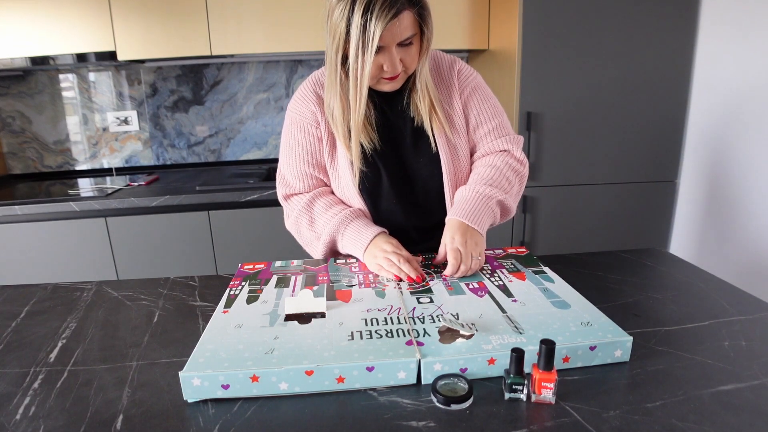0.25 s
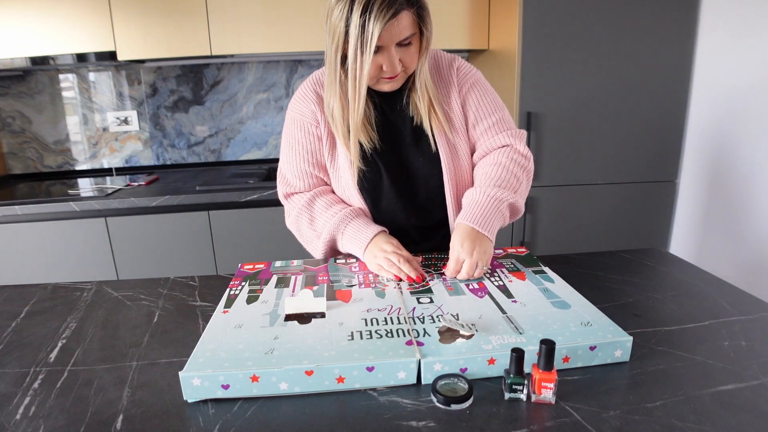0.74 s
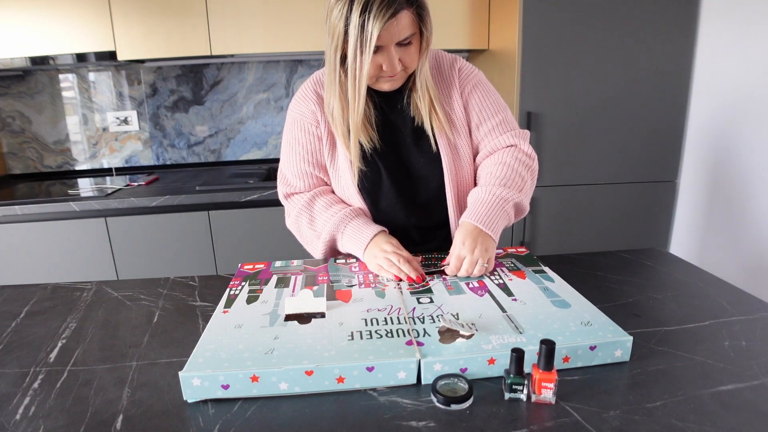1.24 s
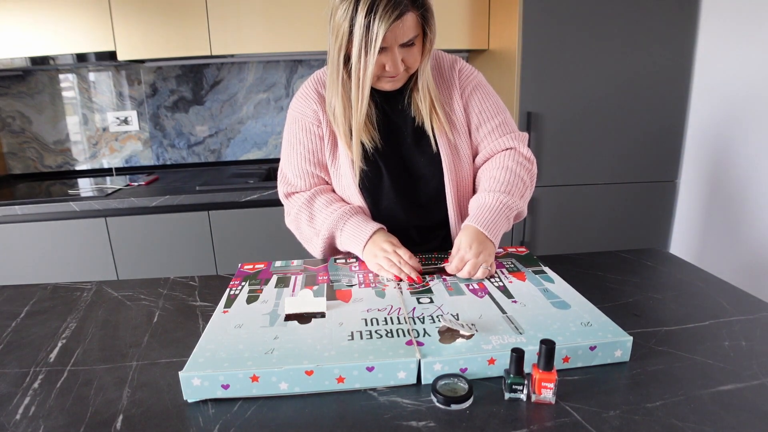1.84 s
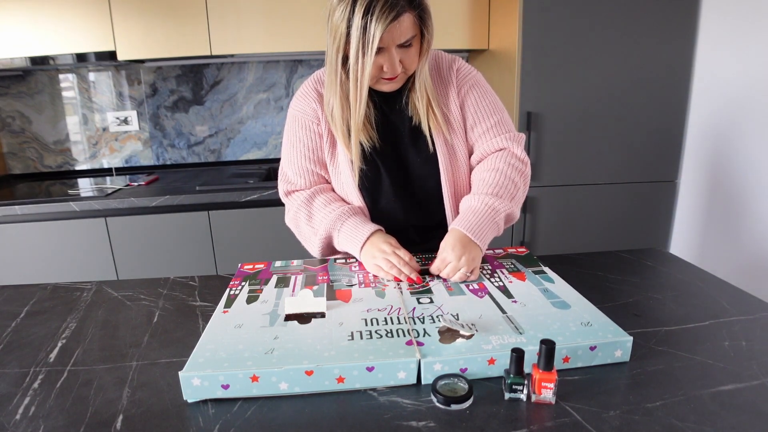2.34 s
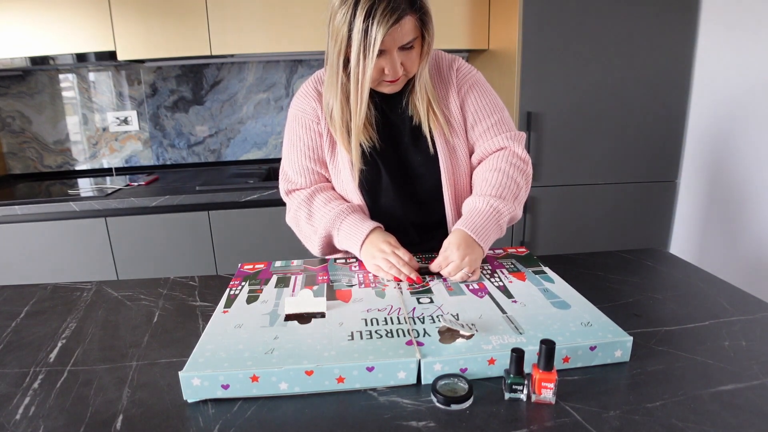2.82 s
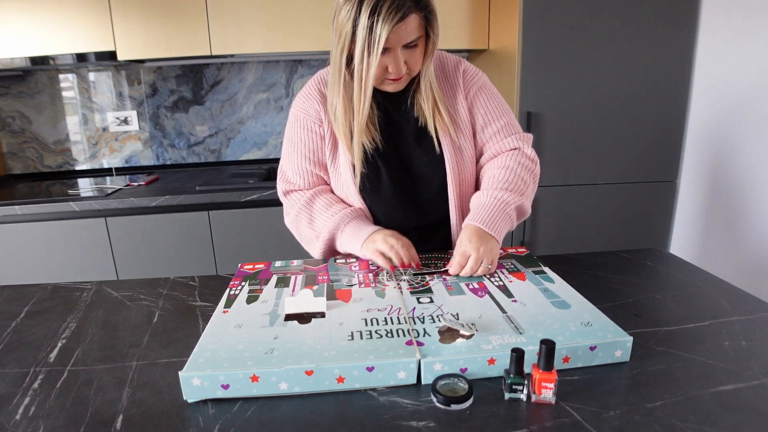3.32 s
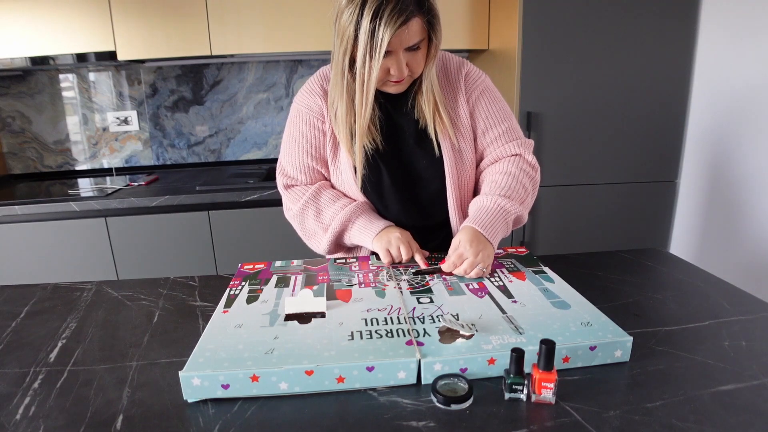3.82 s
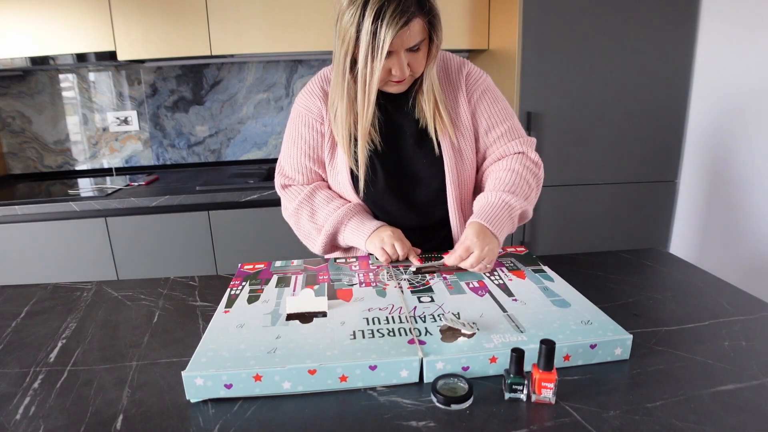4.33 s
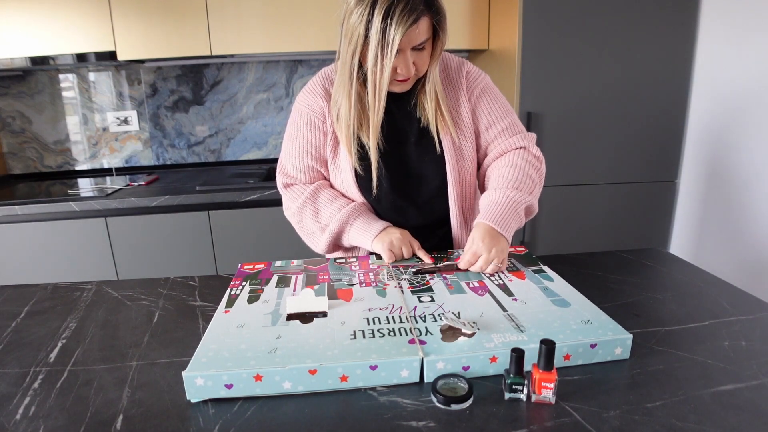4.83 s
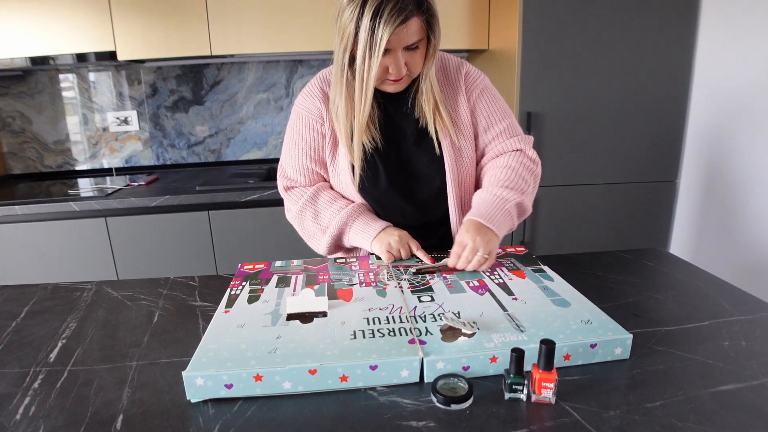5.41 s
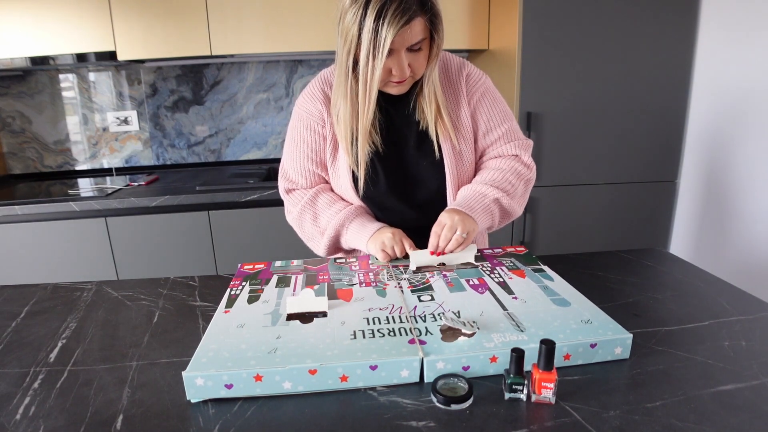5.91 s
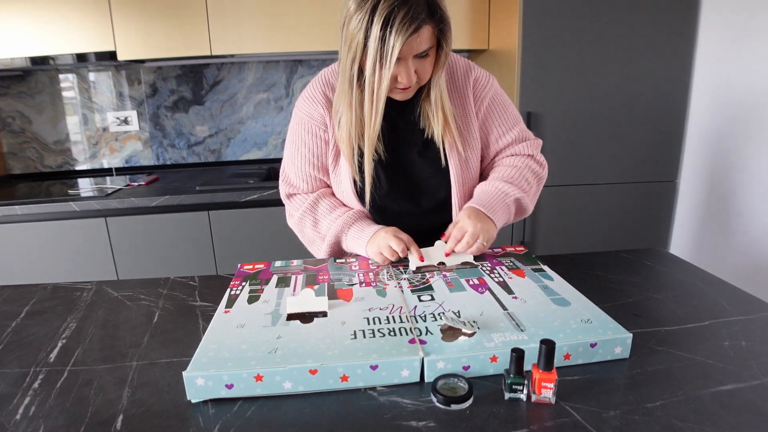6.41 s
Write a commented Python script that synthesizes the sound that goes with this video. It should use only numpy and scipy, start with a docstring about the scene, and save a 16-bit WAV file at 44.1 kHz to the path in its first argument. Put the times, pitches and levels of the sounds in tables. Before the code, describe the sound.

Fingers pry at a perforated flap in a thin, flat hollow cardboard box. A crisp snap comes first, then a loud tight cluster of tearing cracks with hollow thuds, and another single snap. After that come quieter ticks and soft papery rustling, growing busier and crisper towards the end. Close-to-medium stereo microphone in a hard-walled kitchen, short bright reverberation, faint steady hush.

```python
"""Perforations in a card lid tear: fingers pry at a flap in the thin lid of a flat hollow box, in a bare
kitchen. Each snap is a short ragged noise burst that excites resonances of box, lid, flap, torn edge and
fibres. Thumps under the stronger snaps and booms excite the low modes of the box; the rustle of rubbing is a
dense train of random slips, with crackles, and the same noise also carries a lingering wash after snaps. Hard
walls add early echoes and a diffuse tail that decays band by band, over a faint steady hush."""
import sys
import numpy as np
from scipy import signal
from scipy.fft import rfft, irfft, next_fast_len
from scipy.io import wavfile

SR = 44100
rng = np.random.default_rng(int(sys.argv[2]) if len(sys.argv) > 2 else 0)


def put_to_file(sound):
    """Save the sound as 16-bit audio at rate SR, in the file named by the first command-line argument."""
    columns = np.atleast_2d(sound).T  # one column per channel
    safe = np.clip(columns, -1, 1)
    whole_steps = np.round(safe * 32767)
    wavfile.write(sys.argv[1], SR, whole_steps.astype(np.int16))


N = 293474  # samples

# Resonances of the hollow box, its lid and the flap, broad because card is lossy:
# (frequency [Hz], width at about -6 dB [Hz], relative level [dB])
BOX_MODES = [(247.6, 113, -7), (288, 67, -7.5), (336, 48, -4), (409, 95, -8.5), (484, 47, 0),
             (551, 120, -5)]
LID_MODES = [(717, 240, 2), (871, 94, -6.5), (1099, 410, -3.5)]
FLAP_MODES = [(1185, 750, 0), (1750, 690, 0), (2214, 660, 0.016)]


def snaps():
    """Impulsive excitation: each tear drives six resonant parts, in proportions set by its colour and pitch."""
    # Perforations letting go: (time [s], drive level [dB], lid body [dB re drive], edge rasp [dB re drive],
    # fibre tick [dB re drive], low, middle and high tab ring [Hz], ring strength [dB], length [ms])
    snap_events = [(0.0271, -19.5, -16.5, -21.5, -22, 2140, 2510, 6660, 6.8, 2.15),
                   (0.1078, -27.5, -15, -8, -13, 1440, 3300, 5970, 7.8, 1.3),
                   (0.167, -20, -4.5, -15, -17, 1550, 3220, 5400, 8.9, 2.1),
                   (0.1778, -5.5, -11, -18.5, -22, 694, 3300, 5500, 5.7, 1.9),
                   (0.2019, -29, -3.5, -8, -11, 780, 4000, 5200, 14, 1.8),
                   (0.612, -25, -23, -29, -34, 861, 2600, 5000, 5.7, 1.2),
                   (0.6584, -39.5, -10, -19, -22, 789, 2610, 5080, 7, 2),
                   (0.6926, -40.5, 0, -13, -18, 1930, 3020, 6250, 13, 1.2),
                   (0.7037, -6.5, -15, -13, -18.5, 2130, 3360, 5800, 5.5, 1.57),
                   (0.7076, -2, -25, -36, -35, 1930, 2650, 5850, 2.5, 2.1),
                   (0.7497, -7.5, -11.5, -19.5, -20, 1340, 2670, 5530, 7, 2.3),
                   (0.7536, -11.5, -7, -20, -29, 875, 2640, 4880, 9.5, 1.5),
                   (0.7784, -15.5, -4, -9.5, -18, 850, 3060, 6080, 6.7, 1.65),
                   (0.7866, -5.5, -13, -32, -38, 820, 2670, 5910, 4.5, 2),
                   (0.8255, -19.5, -4.5, -24, -26, 856, 2410, 5600, 5.5, 2.2),
                   (0.8614, -18, -8.5, -13, -12, 776, 4500, 7840, 8.6, 1.5),
                   (0.8704, -6.5, -8, -20.5, -20, 850, 2800, 8000, 5.5, 1.46),
                   (0.9038, -13.5, -1.5, -12, -11, 700, 3440, 6080, 3.2, 1.7),
                   (0.9184, -13, -12.5, -13.5, -15, 1220, 3100, 5100, 7.2, 2.2),
                   (0.9406, -20.5, -13, -33, -27, 1380, 2460, 6370, 13, 1.8),
                   (0.9544, -23.5, -6, -12, -17, 724, 2470, 6000, 9.1, 2),
                   (1.056, -26, -17, -19, -30, 740, 2560, 5940, 11, 1.8),
                   (1.0714, -32.5, -10, -9, -8, 680, 2490, 5580, 6, 1.8),
                   (1.1021, -19, -16.5, -12.5, -15.5, 861, 2640, 7430, 5.2, 2.1),
                   (1.3061, -36, -19, -15, -13, 2240, 3480, 8130, 7.5, 2),
                   (1.4524, -36, -17, -15, -20, 1800, 2600, 6100, 7, 2.2),
                   (1.4711, -4, -15.5, -15.5, -17.5, 840, 2570, 5500, 5.3, 1.64),
                   (1.8217, -46, -20, -18, -30, 1900, 2440, 6360, 10, 2.4),
                   (2.01, -35, -18.5, -18, -38, 2480, 2630, 6180, 7.5, 1.8),
                   (2.0856, -26, -29.5, -25, -22, 1960, 3040, 6580, 5.2, 2),
                   (2.1793, -36, -13, -17, -26, 2200, 2830, 4900, 7.8, 1.8),
                   (2.2787, -31.5, -31, -21.5, -27, 1870, 3840, 5000, 4.6, 2.6),
                   (2.3505, -26.5, -12.5, -18.5, -31, 1080, 3220, 5200, 8.1, 2.15),
                   (2.3853, -13, -27.5, -28, -37, 1180, 2580, 5360, 6.2, 2.2),
                   (2.471, -38, -8, -16, -24, 2090, 3580, 5990, 8.4, 1.8),
                   (2.5089, -27, -37, -18, -25, 1690, 4060, 7130, 5.8, 1.2),
                   (2.5154, -32, -20, -26, -30, 2100, 3920, 4900, 9.9, 1.8),
                   (2.5278, -34, -34, -15, -31, 1590, 3590, 7270, 8.2, 1.8),
                   (2.5373, -33.5, -24, -25, -34, 2100, 4300, 4990, 8.3, 1.8),
                   (2.6532, -18.5, -21.5, -18.5, -24, 1860, 2860, 6900, 9.6, 2.3),
                   (2.6689, -21, -12.5, -16, -14.5, 2140, 3670, 7070, 11.5, 1.54),
                   (2.686, -20.5, -19, -17, -19, 1700, 2850, 7100, 5, 2.1),
                   (2.7084, -25.5, -19, -31, -25, 1800, 2430, 6700, 8.1, 2),
                   (2.7824, -39, -20, -20, -29, 1810, 3060, 7500, 7.8, 1.8),
                   (2.8011, -39, -24, -22, -27, 1720, 3270, 6780, 6.3, 2),
                   (2.8647, -41.5, -8.5, -30, -32, 1770, 2750, 6740, 6.4, 1.5),
                   (2.8838, -29.5, -27, -25, -31, 1190, 2650, 6600, 5.2, 2.1),
                   (2.9578, -10, -30.5, -35, -48, 1140, 3740, 5400, 8.9, 1.4),
                   (3.0145, -23.5, -27, -29, -36, 1950, 2500, 5030, 4.3, 2.1),
                   (3.0572, -24, -14.5, -39, -42, 940, 2720, 5040, 8.2, 1.9),
                   (3.1063, -36, -16, -26, -23, 1130, 3420, 7080, 10, 1.8),
                   (3.1402, -39, -21, -10, -26, 1770, 3970, 7280, 6.2, 2.3),
                   (3.1642, -39, -1.5, -21, -26, 1190, 2770, 6040, 10.4, 2.4),
                   (3.3513, -36, -19, -20, -22, 2170, 3400, 7520, 8.6, 2.1),
                   (3.381, -60, 8, 5, 1, 1890, 3070, 5760, 8.6, 2),
                   (3.4105, -30, -15, -12, -22, 800, 3420, 5770, 6.2, 2),
                   (3.5233, -38, -6, -31, -14, 2080, 3200, 6160, 12.7, 1.7),
                   (3.6094, -36, -9, -16, -23, 2090, 4660, 7670, 8.2, 2.2),
                   (3.6823, -33.5, -22, -26, -40, 2040, 3380, 6270, 9.4, 2),
                   (3.857, -40.5, -20, -19, -22, 2120, 2850, 6370, 6.4, 2.3),
                   (3.904, -33, -9.5, -8, -23, 1070, 2670, 5430, 6.3, 1.5),
                   (4.1834, -46, -33, -15.5, -40, 802, 3470, 5670, 7, 1.8),
                   (4.2026, -36, -43, -13, -26, 2220, 3170, 5190, 5.6, 2.8),
                   (4.2506, -26, -22, -17, -25, 2030, 2620, 7300, 7, 2.5),
                   (4.2582, -23, -16, -10, -23, 760, 2780, 7150, 11.8, 2),
                   (4.2771, -27, -17, -13, -17, 694, 2720, 7070, 6, 2.3),
                   (4.3007, -24.5, -17, -7, -12, 2200, 4750, 7700, 8.2, 1.9),
                   (4.4284, -43, -18, -19, -24, 1060, 3000, 7570, 8, 1.5),
                   (4.4367, -33, -11, -29, -28, 1180, 2470, 5480, 11, 1.43),
                   (4.7477, -41, -37, -13, -34, 2230, 4000, 5060, 11, 2.6),
                   (4.8772, -34, -34, -18, -23, 1750, 2960, 6200, 9.7, 2.7),
                   (4.9897, -28, -15.5, -10.5, -13.5, 1290, 3700, 6100, 5.3, 2.3),
                   (5.0178, -32.5, -21, -10, -18, 2100, 3050, 6700, 7.3, 1.7),
                   (5.1211, -29.5, -37, -8.5, -19, 2300, 3980, 6500, 6.5, 2),
                   (5.1639, -30, -45, -14, -20, 2270, 3850, 8310, 6.4, 2.5),
                   (5.2016, -36.5, -30, -7, -16, 2070, 3840, 5350, 4.5, 1.3),
                   (5.2123, -37.5, -36, -7, -13, 2160, 2610, 6510, 5.8, 1.6),
                   (5.232, -41, -28, -4.5, -13, 1850, 3720, 6380, 7, 2),
                   (5.2887, -30.5, -37, -21, -56, 1800, 2980, 5740, 10.2, 1.9),
                   (5.3205, -32, -32, -21, -26, 1970, 2940, 5940, 8.6, 1.6),
                   (5.3472, -44, -32, -10, -28, 1920, 3260, 4900, 7, 1.8),
                   (5.3722, -31, -42, -22, -41, 1770, 3290, 6350, 11, 1.9),
                   (5.4103, -31, -41, -23, -34, 1860, 2980, 4930, 10, 1.9),
                   (5.4446, -29, -44, -22, -33, 2050, 2890, 4980, 9.3, 2.8),
                   (5.4736, -29.5, -24, -17, -21, 2160, 3220, 6550, 8.3, 2),
                   (5.5147, -34.5, -50, -15, -20, 1800, 3640, 5600, 9.9, 1.8),
                   (5.5837, -35, -39, -15, -24, 2260, 3590, 6340, 7, 1.6),
                   (5.5983, -36, -35, -12, -23, 2170, 3110, 5150, 9.3, 3.6),
                   (5.6153, -30, -16.5, -11, -19, 700, 3370, 5660, 7.3, 2.2),
                   (5.6889, -41, -33, -17, -27, 732, 3270, 5920, 9.1, 2),
                   (5.7693, -43, -23, -6, -8, 2120, 2790, 5800, 9.1, 0.61),
                   (5.7804, -50, -29, 2, -6, 2030, 3240, 5600, 20, 1.5),
                   (5.8135, -29, -49, -27, -38, 2230, 3140, 5810, 11, 1.5),
                   (5.825, -30, -41, -31, -38, 1700, 3440, 5770, 7, 1.8),
                   (5.8484, -49, -23, -3, -7, 2230, 3330, 6410, 6, 1.3),
                   (5.8681, -39.5, -26, 3, -4, 1500, 3580, 5500, 10, 1.4),
                   (5.9034, -36, -29, -9, -9, 2000, 2620, 5250, 4, 2.6),
                   (5.9218, -29, -32, -8, -13, 2150, 3420, 5400, 9.4, 1.9),
                   (5.9264, -21.5, -22, -16.5, -23, 2230, 3150, 5300, 9.4, 1.6),
                   (6.025, -39, -13, -15, -11, 1540, 2980, 5260, 7, 2.6),
                   (6.143, -35, -21, -2.5, -12, 1740, 4790, 5130, 8.3, 1.6),
                   (6.1498, -33, -20, -21, -25, 2230, 4820, 4940, 5.6, 1.6),
                   (6.1585, -21, -27, -12.5, -17.5, 2350, 2360, 5200, 6.9, 1.8),
                   (6.2243, -36.5, -18, -4, -9, 2300, 4340, 5250, 5, 2.2),
                   (6.242, -35.5, -10.5, -18, -10, 1430, 3010, 5240, 11, 1.6),
                   (6.253, -38.5, -14, 6.5, 1, 2270, 4130, 6900, 7.5, 1.8),
                   (6.265, -35.5, -11, 0, -5, 1640, 4020, 6660, 10, 2.3),
                   (6.2922, -16, -13, -10.5, -14.5, 2270, 2340, 5880, 5.2, 2.43),
                   (6.3202, -31.5, -28, -1, -18, 1130, 2360, 6850, 7, 2.7),
                   (6.4214, -33, -17, -16, -18, 2250, 2400, 5570, 6.3, 1.5),
                   (6.4806, -35, -19, -22, -31, 1490, 3590, 6150, 11, 1.7),
                   (6.4915, -29.5, -14.5, -17.5, -35, 872, 3690, 5590, 10.5, 1.3)]
    # Drive of box, lid, flap, crack, edge, fibres: (level [dB re drive], share of body [dB/dB],
    # share of rasp [dB/dB], share of tick [dB/dB], slope with ring pitch above 2 kHz [dB/octave])
    part_drive = [(-15.5, 0.78, -0.24, 0.25, 1), (1.5, 1.0, -0.021, 0.033, -3),
                  (-9.5, 0.31, -0.18, 0.044, -1), (-5.5, -0.086, 0.52, 0.0052, -1),
                  (-3.5, 0.0087, 0.92, 0.017, 1.5), (-4, -0.14, 0.083, 1.05, 0)]
    # Ring strength of the middle ring, the high ring and its overtone: (level [dB re low ring])
    ring_steps = [0.33, -2, -3.5]
    # Resonances of crack, torn edge and fibres: (frequency [Hz], width at about -6 dB [Hz], relative level [dB])
    crack_modes = [(2580, 860, 3.3), (3440, 1960, 2.5), (4460, 1790, -4.5)]
    edge_modes = [(5350, 2300, 0.17), (6400, 6200, -1.6), (7940, 3700, -0.27)]
    fibre_modes = [(9340, 3100, 8), (11140, 5400, 2), (14900, 2600, -2)]
    overtone_ratio = 1.73

    rows = np.array(snap_events)
    base_db, *shares = np.transpose(part_drive)
    ragged = rng.standard_normal((len(rows), 512))
    drive = np.zeros((6, N + 512))
    for row, noise in zip(rows, ragged):
        s, level_db, body_db, rasp_db, tick_db, low_hz, mid_hz, high_hz, ring_db, length_ms = row
        overtone_hz = min(overtone_ratio * high_hz, 15000)
        rings = [(low_hz, ring_db),
                 (mid_hz, ring_db + ring_steps[0]),
                 (high_hz, ring_db + ring_steps[1]),
                 (overtone_hz, ring_db + ring_steps[2])]
        burst = tear(noise, length_ms, rings)
        pitch_octaves = np.log2(np.sqrt(low_hz * mid_hz) / 2000)
        colour = [body_db, rasp_db, tick_db, pitch_octaves]
        gains = from_db(level_db + base_db + np.dot(colour, shares))
        start = max(round(s * SR) - 20, 0)
        drive[:, start:start + 512] += gains[:, None] * burst
    parts = [BOX_MODES, LID_MODES, FLAP_MODES, crack_modes, edge_modes, fibre_modes]
    return sum(resonate(force[:N], modes) for force, modes in zip(drive, parts))


def tear(noise, length_ms, rings, evenness=0.7):
    """Fracture noise: a ragged burst, nearly even in spectrum; any rings given boost it at the tab's modes."""
    ring_q = 9
    peak_s = np.clip(length_ms, .3, 6) / 2000  # the envelope peaks at half the length
    rise = np.arange(len(noise)) / SR / peak_s
    shape = rise * np.exp(1 - rise)
    burst = noise * shape
    for _ in range(3):  # flatten the spectrum, then restore some of the envelope
        spectrum = rfft(burst)
        flattened = irfft(spectrum / (np.abs(spectrum) + 1e-9) ** evenness, len(noise))
        burst = flattened * shape ** 0.032
    burst = burst * np.sqrt(np.sum(shape ** 2) / np.sum(burst ** 2))
    for ring_hz, ring_db in rings:
        b, a = signal.iirpeak(ring_hz, ring_q, fs=SR)
        boost = from_db(min(ring_db, 13)) - 1
        burst = burst + boost * signal.lfilter(b, a, burst)
    return burst


def resonate(x, modes):
    """Modal superposition: parallel resonances, three passes each; white noise of rms 1 leaves at rms 1."""
    impulse = np.arange(N) == 0
    both = np.array([x, impulse]) + 1e-18  # the offset keeps the filters clear of denormals
    out = 0
    for k, (hz, width_hz, level_db) in enumerate(modes):
        r = np.exp(-1.4 * np.pi * width_hz / SR)  # each pass wider, as three in a row narrow the peak
        stage = [(1 - r * r) / 2, 0, (r * r - 1) / 2, 1, -2 * r * np.cos(2 * np.pi * hz / SR), r * r]
        sign = (-1) ** k
        out = out + sign * from_db(level_db) * signal.sosfilt([stage, stage, stage], both)
    response, impulse_response = out
    return response / np.sqrt(np.sum(impulse_response ** 2))


def thumps():
    """Forced modal response: under the stronger snaps, a short ragged push into the low modes of the hollow box."""
    # Thumps of the hollow box under the stronger snaps: (time [s], drive level [dB])
    thump_events = [(0.1667, -29), (0.178, -22), (0.202, -28), (0.7505, -33), (0.7858, -39), (0.9036, -24),
                    (1.4717, -25.5), (2.01, -56), (2.348, -45), (2.654, -42), (2.673, -42.5),
                    (3.1641, -42.5), (3.41, -45.5), (3.5236, -49), (4.2587, -39), (4.4285, -39.5),
                    (4.75, -47), (4.9921, -46.5), (5.1108, -54), (5.4442, -49), (5.5144, -52.5),
                    (5.6159, -41.5), (5.7815, -49), (5.8247, -50), (5.8676, -55), (5.904, -49),
                    (5.929, -42), (6.2925, -47.5)]
    push = np.zeros(N + 512)
    for (s, level_db), noise in zip(thump_events, rng.standard_normal((len(thump_events), 512))):
        start = round(s * SR) - 20
        push[start:start + 512] += from_db(level_db) * tear(noise, length_ms=2.28, rings=[])
    return resonate(push[:N], BOX_MODES)


def booms():
    """Impulse response: the whole box drums on the worktop, one push for each boom into its low modes."""
    # Drumming of the box: (time [s], peak level of the response before the room [dB])
    boom_events = [(0.179, -41.5), (0.74, -63), (0.861, -45), (0.976, -58), (1.466, -58), (3.141, -69),
                   (4.49, -59), (4.877, -74), (4.989, -63), (5.615, -61), (6.3, -50.5)]
    # Low modes of the box: (frequency [Hz], width at about -6 dB [Hz], relative level [dB])
    drum_modes = [(133, 33, -0.93), (166.5, 130, -1.2)]
    push = np.zeros(N)
    for s, peak_db in boom_events:
        push[round(s * SR)] = from_db(peak_db)
    unit = resonate(np.arange(N) == 0, drum_modes)
    return resonate(push, drum_modes) / np.max(np.abs(unit))


def rustle():
    """Granular noise: clumped slips and sparse crackles make the rustle of rubbing; the same noise carries the
    wash after snaps."""
    # Resonances that colour scrape and hiss: (frequency [Hz], width at about -6 dB [Hz], relative level [dB])
    scrape_modes = [(2650, 500, 4), (3370, 1340, -1), (4290, 1400, 0.5), (5600, 2400, -5)]
    hiss_modes = [(6720, 2800, 6), (9550, 5200, -1), (14900, 5200, -5)]
    clumps_per_s, clump_spread_db = 60, 2.5
    crackle_db = -16

    flap, scrape, hiss, rumble = swells()
    lumps = rng.standard_normal(round(clumps_per_s * N / SR) + 2)
    clump_position = np.arange(N) / SR * clumps_per_s
    clumping = from_db(clump_spread_db * np.interp(clump_position, np.arange(len(lumps)), lumps))
    slips = grains(per_s=5000, spread_db=4.0) * clumping
    crackly = slips + from_db(crackle_db) * grains(per_s=60, spread_db=3.0)
    flap_sound = resonate(flap * crackly[::-1], FLAP_MODES)  # reversed, so unlike the scrape
    scrape_sound = resonate(scrape * crackly, scrape_modes)
    hiss_sound = resonate(hiss * slips, hiss_modes)
    lid_sound = resonate(rumble * grains(per_s=2000, spread_db=6.0), BOX_MODES + LID_MODES)
    return flap_sound + scrape_sound + hiss_sound + lid_sound


def swells():
    """Power summation: exponential swells and fades over a floor; gains of flap, scrape, hiss and lid."""
    # Rustle of rubbing and the lingering wash after snaps: (strongest time [s], rise over 20 dB [s],
    # fall over 20 dB [s], drive level [dB], treble [dB], lid rumble [dB re drive])
    swell_events = [(0.05, 0.063, 0.65, -60.5, 3.5, -7), (0.248, 0.21, 0.24, -45.5, -9, 6),
                    (0.848, 0.061, 0.053, -38, -6, 11), (0.94, 0.042, 0.28, -47.5, -6, 7),
                    (1.3, 0.083, 0.26, -57, -1, -5), (1.56, .06, 0.21, -40.5, -10.5, -1),
                    (2.14, 0.22, 0.084, -50.5, 2, -22), (2.49, 0.23, 0.34, -60, -20, -3.5),
                    (2.72, 0.3, .3, -51.5, -5, -12), (3.13, 0.17, 0.33, -53, -1.5, -8),
                    (3.4, 0.13, 0.23, -56, 1.5, 0.5), (3.54, 0.3, 0.43, -56.5, 0.5, -5),
                    (3.95, 0.069, 0.42, -65, -5, 1), (4.38, 0.21, 0.22, -47, -3, -4.5),
                    (4.48, .05, 0.13, -54, 0, -5), (4.79, 0.13, 0.23, -49.5, -4.5, -12.5),
                    (5.02, 0.13, 0.1, -56, 4, -10), (5.16, 0.066, 0.085, -63, -1, -19),
                    (5.49, .15, 0.14, -48, 0, -13), (5.6, .06, 0.05, -55, -2, -8),
                    (5.72, 0.052, 0.083, -64, -5, -2), (5.88, 0.046, 0.13, -64, -1, 1),
                    (5.998, 0.23, 0.12, -41.5, -1.5, -6.5), (6.2, 0.13, .1, -66, 5, -4),
                    (6.37, 0.15, 0.2, -46.5, -5.5, -11)]
    # Steady floor of flap, scrape, hiss, lid: (gain [dB])
    resting_db = [-73.5, -82, -81, -75]
    # Flap, scrape, hiss: (level [dB re drive], share of treble [dB/dB], share of rumble [dB/dB])
    swell_drive = [(-6, -0.64, 0.41), (0.5, -0.06, 0.07), (-3.16, 1.0, 0.043)]
    drop_db = 20

    t = np.arange(0, N + 64, 64) / SR  # one gain every 64 samples
    power = from_db(resting_db)[:, None] ** 2 + 0 * t
    base_db, treble_share, rumble_share = np.transpose(swell_drive)
    for s, rise_s, fall_s, level_db, treble_db, rumble_db in swell_events:
        away = np.where(t < s, (s - t) / max(rise_s, .01), (t - s) / max(fall_s, .01))
        upper_db = base_db + treble_share * treble_db + rumble_share * rumble_db
        parts_db = level_db + np.append(upper_db, rumble_db)
        power = power + from_db(parts_db[:, None] - drop_db * away) ** 2
    return [np.interp(np.arange(N) / SR, t, np.sqrt(p)) for p in power]


def grains(per_s, spread_db):
    """Shot noise: random slips of uneven size and either sign, at overall rms 1."""
    sizes = from_db(spread_db * np.minimum(rng.exponential(1, N), 5))
    signed = sizes * rng.choice([-1, 1], N)
    return rms_one(signed * (rng.random(N) < per_s / SR))


def kitchen(x):
    """Room impulse response: direct sound, a few smeared echoes, then a diffuse tail decaying band by band."""
    # Reverberation time: (frequency [Hz], time to decay 60 dB [s])
    decay_times = [(100, 1), (260, 0.44), (700, 0.44), (1840, 0.76), (4850, 0.48), (12800, 0.44)]
    # Spectrum of the tail before decay: (frequency [Hz], band gain [dB])
    tail_colour = [(100, -28), (400, -26), (1000, -33), (2500, -35.5), (6000, -32.5), (15000, -31.5)]
    # Width of the tail: (frequency [Hz], side minus mid [dB])
    tail_side = [(60, -3), (110, -26), (200, -29), (380, -18), (700, -17), (1290, -8.5), (2380, -13.5),
                 (4400, -9.5), (8120, -8), (15000, -15)]
    # Worktop, cupboards, ceiling: (delay [ms], level [dB])
    early_echoes = [(5.5, -10), (8.5, -14), (11.5, -13.5), (15.5, -16)]

    size = round(1.3 * SR)
    t = np.arange(size) / SR
    swell = np.clip((t - .002) / 0.011, 0, 1)
    mid, side = np.zeros(size), np.zeros(size)
    for hz, (band_mid, band_side) in bands(rng.standard_normal((2, 2, size))):
        fade = swell * from_db(at_hz(tail_colour, hz) - 60 * t / at_hz(decay_times, hz))
        mid += band_mid * fade
        side += band_side * fade * from_db(at_hz(tail_side, hz))
    for delay_ms, echo_db in early_echoes:
        start = round(delay_ms * SR / 1000)
        smear = rng.standard_normal((2, 90)) * np.exp(-np.arange(90) / 10.0)
        smear = smear / np.sqrt(np.sum(smear[0] ** 2))
        mid[start:start + 90] += from_db(echo_db) * smear[0]
        side[start:start + 90] += from_db(echo_db - 13.0) * smear[1]
    mid[0] = from_db(-1.0)  # the direct path
    left_right = np.array([mid + side, mid - side])
    pad = next_fast_len(N + size)
    return irfft(rfft(x, pad) * rfft(left_right, pad), pad)[:, :N]


def hush():
    """Partially correlated stereo noise: the steady background of the room and the microphone."""
    # Spectrum: (frequency [Hz], relative band gain [dB])
    hush_colour = [(15, -68), (25, -26), (150, 8.5), (245, 12), (410, 9), (746, 3), (952, 23.5),
                   (1120, -23.5), (2090, 9.5), (2670, 5.5), (6210, -3.5), (14800, -21), (16500, -38)]
    # Left-right likeness: (frequency [Hz], correlation [-1 to 1])
    likeness = [(60, 0.52), (240, 0.41), (950, 0.12), (3770, 0.68), (15000, 0.26)]
    hush_db = -60  # rms over both channels

    out = 0
    for hz, (mid, side) in bands(rng.standard_normal((2, 2, N))):
        alike = np.clip(at_hz(likeness, hz), -1, 1)
        pair = np.sqrt(1 + alike) * mid + np.sqrt(1 - alike) * side * [[1], [-1]]
        out = out + from_db(at_hz(hush_colour, hz)) * pair
    return from_db(hush_db) * rms_one(out)


def bands(white):
    """Band-pass analysis: half-octave slices of (mid, side) noise; neighbours come from unrelated draws."""
    edges_hz = 30 * 2 ** np.arange(0, 9.3, .5)
    for k, (low, high) in enumerate(zip(edges_hz, edges_hz[1:])):
        sos = signal.butter(2, [low, high], "band", fs=SR, output="sos")
        yield np.sqrt(low * high), signal.sosfilt(sos, white[k % 2])


def from_db(db):
    """Decibel law: the amplitude gain of a level in dB."""
    return 10 ** (np.asarray(db) / 20)


def rms_one(x):
    """Power normalisation: scaled to rms 1."""
    return x / np.sqrt(np.mean(x ** 2) + 1e-20)


def at_hz(points, hz):
    """Logarithmic pitch scale: a (frequency [Hz], value) table read on a log-frequency axis."""
    table = np.array(points)
    return np.interp(np.log(hz), np.log(table[:, 0]), table[:, 1])


def scene():
    """Linear superposition: all sounds of the card share the kitchen's response, and the hush is added."""
    return kitchen(snaps() + thumps() + booms() + rustle()) + hush()


def record(dry):
    """Channel response: the two capsules differ a little in level by frequency, and the top is cut steeply."""
    # Balance: (frequency [Hz], left minus right [dB])
    balance = [(60, -2), (240, -0.5), (950, 1.0), (3770, 0), (15000, -1)]
    cutoff_hz = 15900
    hz = np.maximum(np.fft.rfftfreq(N, 1 / SR), 20)
    lean = from_db(at_hz(balance, hz) / 2 * np.array([[1], [-1]]))
    steep = signal.ellip(12, .5, 70, cutoff_hz, fs=SR, output="sos")
    return signal.sosfilt(steep, irfft(rfft(dry) * lean, N))


dry = scene()
out = record(dry)
put_to_file(out)
```